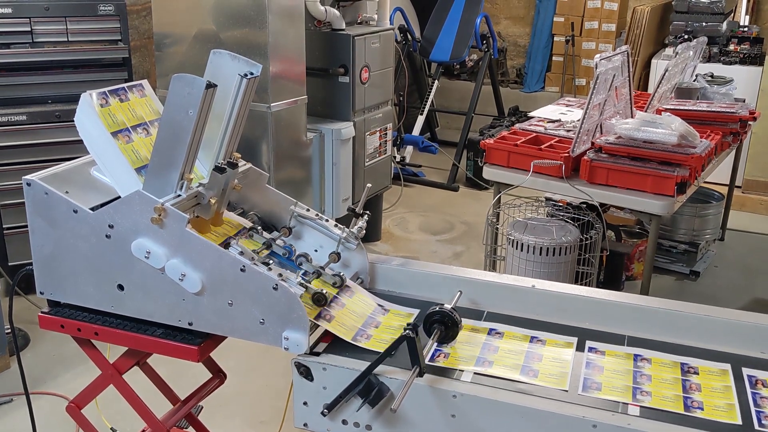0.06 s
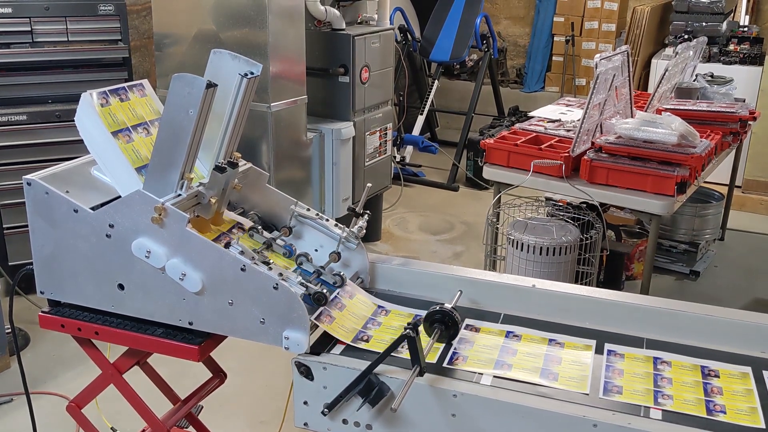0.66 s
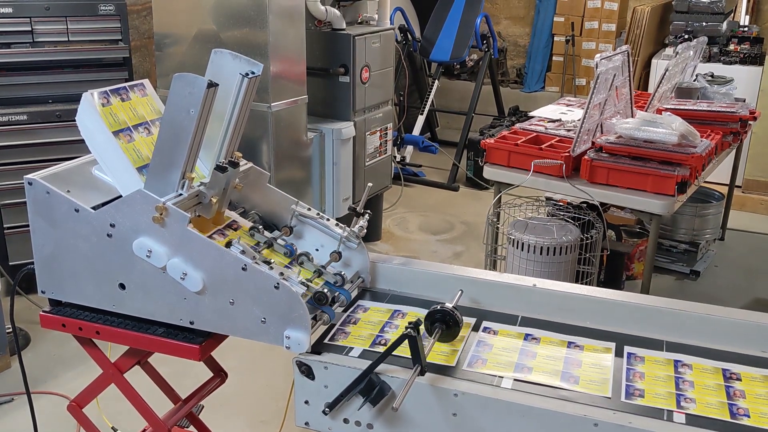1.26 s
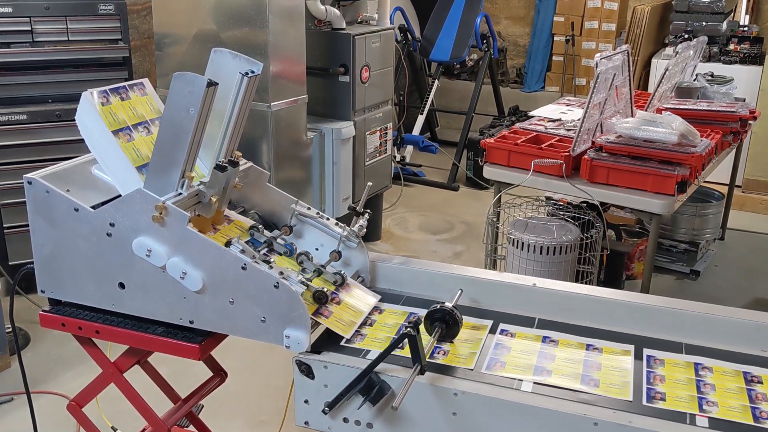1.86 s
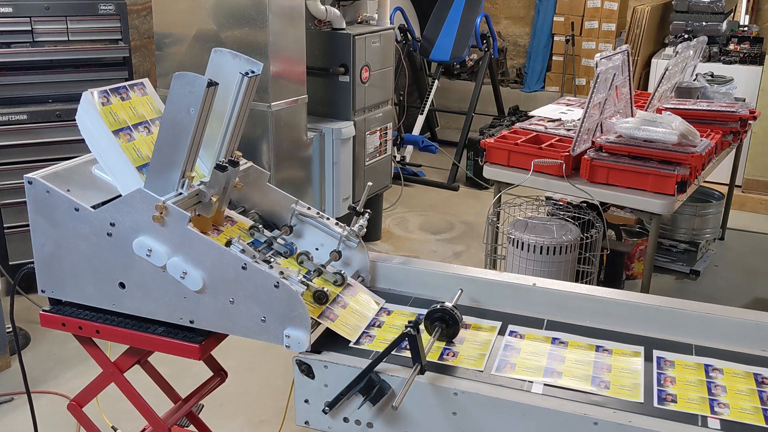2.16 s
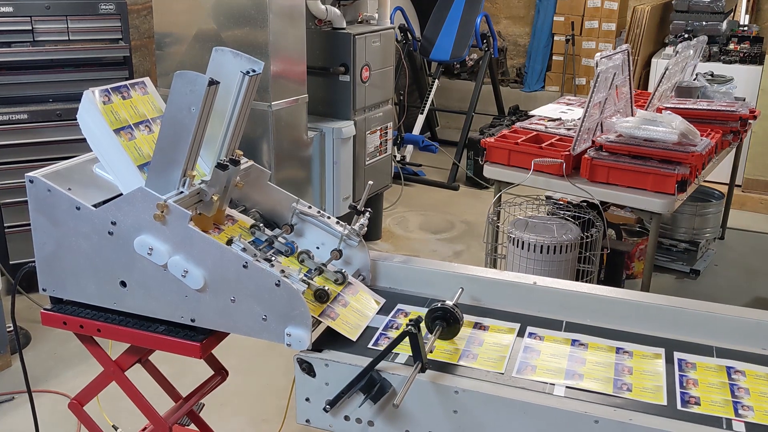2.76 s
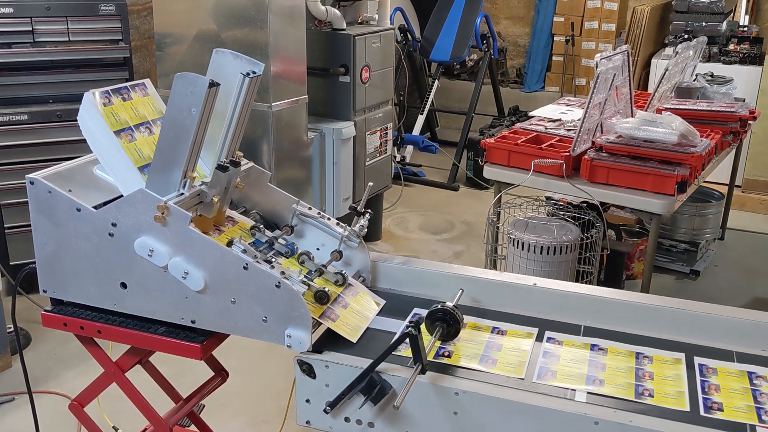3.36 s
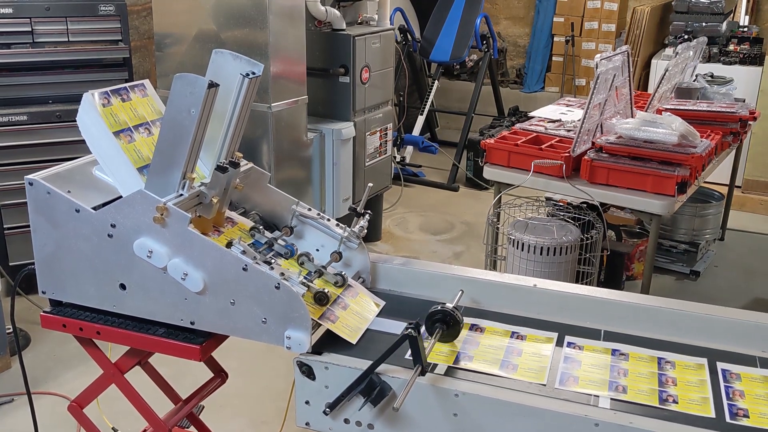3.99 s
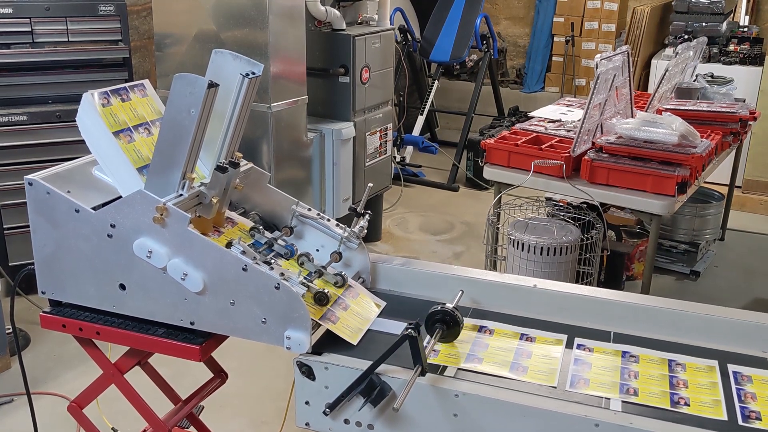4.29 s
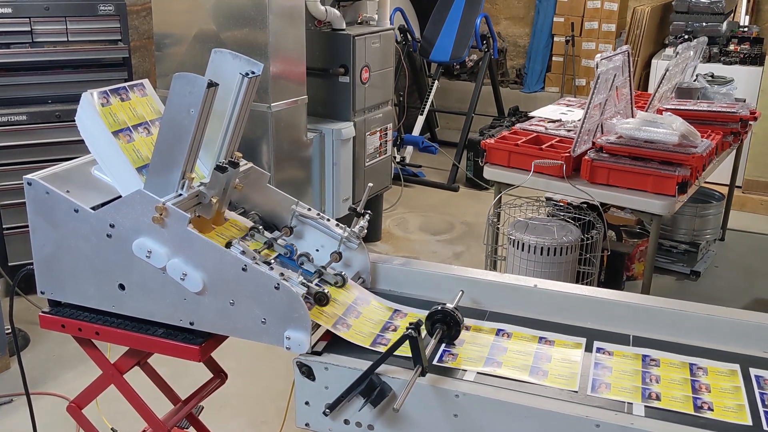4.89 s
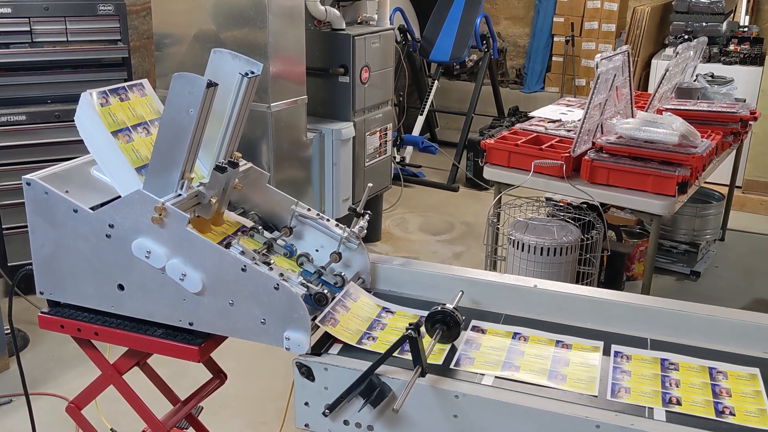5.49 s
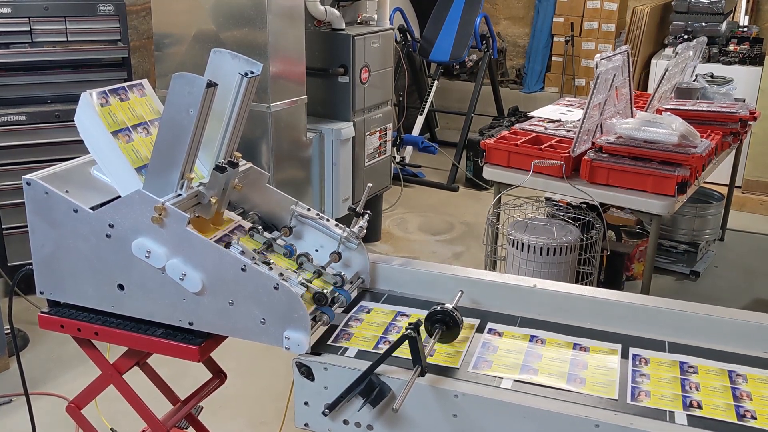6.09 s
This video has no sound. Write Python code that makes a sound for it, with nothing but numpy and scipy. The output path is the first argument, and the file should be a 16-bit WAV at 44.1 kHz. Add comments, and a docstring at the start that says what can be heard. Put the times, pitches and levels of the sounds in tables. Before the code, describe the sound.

From the start, a motorised feeder pushes out cards in a workshop with a short reverberation. Rubber rollers rasp and judder in runs of about nineteen beats a second, rattling the metal frame, ringing the roller shaft and snapping each card. Beneath them a motor hums, drive belts hiss and paper swishes, with an occasional flick of a card edge. The rasp breaks briefly between cards near 0.8 and 1.7 seconds, and a roller gives a short hoot at the second break. At about 2 seconds the feeder stops. Only the much quieter conveyor remains, its belt rubbing and its drum knocking softly and evenly, with a few faint card scuffs. At about 4.4 seconds the feeder restarts with a small bump. The hum, hiss and juddering rasp return, with short gaps near 4.9 and 5.8 seconds, and continue until the end, just past 6 seconds.

```python
"""Rubber rollers rasp and judder, about 19 times a second, as a friction feeder pushes out card after card.
Each judder rattles the metal frame, rings the roller shaft and snaps the card. Underneath, a mains motor
hums, drive belts hiss and paper swishes along the guides. The feeder rests for about two seconds and
starts again; the conveyor that takes the cards rubs and knocks softly in the workshop throughout."""
import sys
import numpy as np
from scipy import signal
from scipy.fft import rfft, irfft, next_fast_len
from scipy.io import wavfile
from scipy.ndimage import uniform_filter1d

SR = 44100
rng = np.random.default_rng(int(sys.argv[2]) if len(sys.argv) > 2 else 0)


def generate_wav(signal):
    """Clip the signal to [-1, 1] and save it as 16-bit WAV at the path in sys.argv[1]."""
    frames = np.transpose(np.atleast_2d(signal))
    scaled = np.clip(frames, -1, 1) * 32767
    pcm = np.round(scaled).astype(np.int16)
    wavfile.write(sys.argv[1], SR, pcm)


N = 275184
TIME = np.arange(N) / SR
SIZE = next_fast_len(N + SR)
HZ = np.maximum(np.arange(SIZE // 2 + 1) * SR / SIZE, 1)
MAINS_HZ, WORKSHOP_T60_S = 60, 0.34

# tone colour of rubber rasping on card: freq_hz, gain_db
RASP_COLOUR = [(290, -56), (500, -7), (612, -24.5), (986, -7), (1080, -6), (1590, -4), (2280, 0.5),
               (2600, -7), (3370, -1.5), (4430, -13), (6640, -27), (15800, -49)]
# tone colour of the frame's rumble: freq_hz, gain_db
RUMBLE_COLOUR = [(30, -15), (45, -58), (90, -28), (130, -16.5), (190, -5), (270, 8.5), (335, -4.5),
                 (420, -13.5), (600, -3.5), (1000, -37.5)]
# resonances of the feeder's metal frame: freq_hz, width_hz, lift_db
FRAME_MODES = [(317, 7.9, 15.5), (730, 93, 8.5), (860, 42, 10.5), (982, 59, 11.5), (1174, 86, 2.5),
               (1356, 45, 7), (1477, 44, 10.5), (1748, 32, 7.5), (1932, 96, 6.5), (2320, 50, -4.5),
               (2347, 71, 8), (2444, 33, 7), (2745, 170, 7), (3430, 82, 7.5), (3787, 90, 8),
               (6450, 140, -2)]


def from_db(db):
    """Decibels to amplitude."""
    return 10 ** (np.asarray(db) / 20)


def rms_one(x):
    """Scale to an rms of 1."""
    return x / np.sqrt(np.mean(x ** 2) + 1e-20)


def noise():
    """Two unrelated channels of white noise."""
    return rng.standard_normal((2, N))


def over_time(rows):
    """Each value column of a curve at every sample."""
    s, *columns = np.transpose(rows)
    return [np.interp(TIME, s, column) for column in columns]


def over_hz(points):
    """Points joined by straight lines on a log-frequency axis."""
    hz, value = np.transpose(points)
    return np.interp(np.log(HZ), np.log(hz), value)


def bell(peak_s, spread_s, at=TIME):
    """A smooth rise and fall that peaks at 1."""
    return np.exp(-((at - peak_s) / spread_s) ** 2 / 2)


def drift(rate_hz):
    """A slow random wander of rms 1."""
    return rms_one(irfft(rfft(rng.standard_normal(SIZE)) / (1 + (HZ / rate_hz) ** 4))[:N])


def taps(rows):
    """One click for each row of time_s, level_db."""
    s, db = np.transpose(rows)
    return np.bincount((s * SR).astype(int), from_db(db), N)


def causal(db):
    """The minimum-phase response with these gains."""
    cepstrum = irfft(np.log(from_db(db)), SIZE)
    fold = np.r_[1, np.full(SIZE // 2 - 1, 2), np.zeros(SIZE - SIZE // 2)]
    return np.exp(rfft(cepstrum * fold))


def mode(x, hz, t60_s):
    """A band-pass resonance of unit noise power."""
    r, w = from_db(-60 / (t60_s * SR)), 2 * np.pi * hz / SR
    return np.sqrt((1 - r * r) / 2) * signal.lfilter([1, 0, -1], [1, -2 * r * np.cos(w), r * r], x + 1e-18)


def radiate(pair, colour, resonances=()):
    """Two unrelated signals become left and right through a body filter of unit power."""
    # how alike the two microphones sound: freq_hz, likeness (capped at 1)
    likeness = [(50, 0.53), (130, 0.87), (240, 0.91), (450, 0.33), (800, 1.37), (1150, 0.2), (2300, 0.4),
                (4300, 0.14), (6500, 0.18), (10000, 0.051), (15000, 0.3)]
    peaks_db = sum(lift / (1 + (2 * (HZ - hz) / width) ** 2) for hz, width, lift in resonances)
    db = over_hz(colour) + peaks_db
    body = causal(db) / np.sqrt(np.mean(from_db(db) ** 2))
    alike = np.clip(over_hz(likeness), -1, 1)
    mid, side = rfft(pair, SIZE) * body * np.sqrt([(1 + alike) / 2, (1 - alike) / 2])
    return irfft([mid + side, mid - side], SIZE)[:, :N]


def ring_out(clicks, t60_s, crack_db, room_db):
    """Each contact gives a crack, a fresh mix of dense plate modes dying fast, and the room's tail."""
    t = TIME[:SR // 2]
    ring = rms_one(from_db(-60 * t / t60_s))
    room = from_db(room_db) * rms_one(from_db(-60 * t / WORKSHOP_T60_S) * (t > .005))
    crack = from_db(crack_db) * rms_one(np.exp(-t / 0.00046))
    decay = ring ** 2 + room ** 2 + crack ** 2
    power = signal.fftconvolve(clicks ** 2, decay / decay.sum())[:N]
    return np.sqrt(np.abs(power)) * noise()


def swells(rows):
    """For each row, noise in one resonance comes and goes."""
    rub = radiate(noise(), [(100, 0), (10000, 0)])
    return sum(from_db(db) * bell(s, spread_s) * mode(rub, hz, np.log(1000) / np.pi / width_hz)
               for s, spread_s, hz, width_hz, db in rows)


def standing_waves(x, ripple_db):
    """Reflections off the bench and walls comb the treble, differently at each microphone."""
    comb = rms_one(uniform_filter1d(rng.standard_normal((2, len(HZ))), size=200, axis=1))
    depth_db = ripple_db * np.clip((HZ - 1500) / 2500, 0, 1)
    return irfft(rfft(x, SIZE) * causal(depth_db * comb), SIZE)[:, :N]


def drum_knocks():
    """The conveyor's drum knocks twice a turn, strong then weak."""
    turn_s, on_beat_s = .2594, 2.247
    strong_db, weak_db, scatter_db = -46.5, -52.5, 1.5  # relative levels
    turns = np.arange(on_beat_s % turn_s, TIME[-1] - turn_s / 2, turn_s)
    hits = [(s + delay_s, db + scatter_db * rng.standard_normal())
            for s in turns for delay_s, db in [(0, strong_db), (turn_s / 2, weak_db)]]
    knocks = from_db(19.5) * ring_out(taps(hits), t60_s=0.26, crack_db=-16, room_db=1)
    return radiate(knocks, [(300, -43), (2400, -10), (3400, 7), (4800, -10), (15000, -22)])


def conveyor():
    """The belt rubs on its resonant bed and the drum knocks lightly, over a faint motor hum."""
    # rise and fall of the conveyor's rumble: time_s, relative_db
    rumble_curve = [(2.25, -67.5), (2.98, -73), (3.84, -63.5), (4.09, -74), (4.3, -69)]
    # tone colour of the rubbing belt: freq_hz, gain_db
    belt_colour = [(25, -14), (45, -6.5), (130, -4), (240, -7), (330, -9.5), (430, -12.5), (520, -13),
                   (620, -4.5), (850, -4.5), (1130, -10.5), (2200, -2), (3300, -3.5), (4500, -11.5),
                   (8500, -14.5), (11000, -21.5), (15800, -18.5)]
    # resonances of the conveyor bed: freq_hz, width_hz, lift_db
    bed_modes = [(583, 21, 11.5), (646, 36, 7.6), (754, 12, 8.2), (1033, 50, 6), (1310, 36, 10.6),
                 (1490, 62, 11.3), (1932, 22, 13.2), (2194, 130, 7.3), (2320, 59, 9), (2470, 12, 7.8),
                 (2930, 70, 10.6), (3260, 35, 5), (7070, 100, 1.3)]
    rumble_db, = over_time(rumble_curve)
    rub_db = -56.5 + 0.16 * (rumble_db - np.mean(rumble_db))
    rub = from_db(rub_db) * radiate(noise(), belt_colour, bed_modes)
    bed_colour = [(400, -33), (600, -8.5), (800, -0.5), (1100, -27), (3000, -66)]
    rumble = from_db(rumble_db + 1.5) * radiate(noise(), bed_colour, bed_modes)
    knocks = drum_knocks()
    hum = sum(from_db(db + 2.1 * drift(6.2)) * np.sin(2 * np.pi * harmonic * MAINS_HZ * TIME)
              for harmonic, db in [(4, -70.5), (6, -77)])
    return rub + rumble + hum + knocks


def scuffs():
    """Now and then a card scuffs along the belt."""
    # brief bright rubs: peak_s, spread_s, pitch_hz, width_hz, level_db
    rubs = [(2.14, .03, 5270, 900, -60), (2.41, 0.022, 6640, 600, -67), (3.56, .03, 3430, 400, -65),
            (4.93, 0.084, 6400, 600, -53)]
    return swells(rubs)


def lift_table():
    """The lift table under the feeder drones at twice the mains and rumbles."""
    # swells of the drone: peak_s, spread_s, relative_db
    surges = [(0.334, 0.085, -69), (1.286, .04, -70), (2.0, .07, -75), (4.903, 0.24, -68)]
    level = from_db(-77) + sum(from_db(db) * bell(s, spread_s) for s, spread_s, db in surges)
    drone = level * from_db(4 + 1.7 * drift(2.3)) * np.sin(4 * np.pi * MAINS_HZ * TIME)
    rumble = from_db(-85) * radiate(noise(), [(30, -44), (60, -29), (115, -16), (170, 20), (300, -15)])
    return drone + rumble


def jolts():
    """The drive jolts the stand."""
    # low bumps: peak_s, spread_s, pitch_hz, width_hz, level_db
    bumps = [(.56, 0.019, 150, 45, -61), (2.11, 0.033, 247, 40, -58.5), (4.378, 0.016, 335, 80, -49),
             (5.22, 0.02, 143, 60, -53)]
    return swells(bumps)


def motor():
    """Magnetic pull shakes the frame at even multiples of the mains; the load makes each line waver."""
    # lines of the hum: mains_multiple, relative_db, waver_db
    partials = [(4, 1, 1), (6, -11, 2.1), (8, -12.5, 1), (12, -24.5, 3.5), (14, -17.5, 3), (16, -29, 6.5)]
    phase = 2 * np.pi * MAINS_HZ * TIME + 0.0068 * drift(22)
    hum = sum(from_db(db + waver_db * drift(14.3)) * np.sin(multiple * phase + rng.uniform(0, 2 * np.pi))
              for multiple, db, waver_db in partials)
    return rms_one(hum)


def drive():
    """Belts and gears hiss, throbbing with the motor's torque, over a low rumble."""
    # tone colour of the hiss: freq_hz, gain_db
    hiss_colour = [(300, -15.5), (560, -6.5), (760, 0), (900, -4), (1150, -6), (1600, -1.5), (2400, -1.5),
                   (4000, 2.5), (5500, 1), (6700, -1), (7800, -20), (10000, -14), (15800, -21)]
    throb = 1 + 0.15 * np.sin(4 * np.pi * MAINS_HZ * TIME)
    hiss = from_db(-44) * radiate(throb * noise(), hiss_colour, FRAME_MODES)
    return hiss + from_db(-52.5) * radiate(noise(), RUMBLE_COLOUR)


def paper(slide_level):
    """Cards swish along the guides and their edges flick past."""
    # card edges catching the guides: time_s, relative_db
    edges = [(0.2982, -51), (1.4631, -44.5), (4.368, -55), (4.6633, -46), (6.1324, -43)]
    # tone colour of sliding paper: freq_hz, gain_db
    swish_colour = [(3000, -20), (6500, 7.5), (8800, 1), (10200, -6.5), (12000, -3), (15800, -7)]
    # resonances of the sheet-metal guides: freq_hz, width_hz, lift_db
    guide_modes = [(6400, 250, 6), (8250, 300, 3.5), (9100, 120, 10.5), (9500, 120, 4), (12100, 400, 0)]
    swish = from_db(-0.5) * radiate(slide_level * noise(), swish_colour, guide_modes)
    flicks = from_db(27.5) * ring_out(taps(edges), t60_s=0.062, crack_db=-11, room_db=-11)
    return swish + radiate(flicks, [(2000, -21), (7000, 2), (12000, -7), (15800, -5)])


def hoots():
    """Between two cards a brief squeak sings out, a little unsteady in pitch."""
    # the squeak's notes: peak_s, spread_s, pitch_hz, level_db
    notes = [(1.69, 0.057, 722, -47.5), (1.62, 0.042, 700, -49)]
    waver = .3 * drift(22)
    return sum(from_db(db) * bell(s, spread_s) * np.sin(2 * np.pi * hz * TIME + waver)
               for s, spread_s, hz, db in notes)


def slips(per_s, spread_db):
    """Tiny random slips of uneven size, as clicks of rms 1."""
    sizes = from_db(spread_db * np.minimum(rng.exponential(1, N), 4)) * rng.choice([-1, 1], N)
    return rms_one(sizes * (rng.random(N) < per_s / SR))


def roller_rasp(grip_s, release_s):
    """Rubber drags over each card in fine slips that ring the frame, dying as the card's tail leaves."""
    # cards passing under the separator roller: start_s, end_s, relative_db
    cards = [(-.05, .72, -43.5), (0.845, 1.618, -44), (1.747, 2.044, -43.5), (4.382, 4.834, -43.5),
             (5.046, 5.706, -43.5), (5.86, 6.3, -43)]
    drag = np.zeros(N)
    for start_s, end_s, db in cards:
        grip = np.clip((TIME - start_s) / grip_s, 0, 1)
        release = np.exp(-np.maximum(TIME - end_s, 0) / release_s)
        drag += from_db(db) * grip * release
    grit = ring_out(slips(per_s=1100, spread_db=3.5), t60_s=0.042, crack_db=1, room_db=5)
    rasp = from_db(-1.5) * radiate(drag * grit, RASP_COLOUR, FRAME_MODES)
    thrum = from_db(-10.5) * drag * radiate(noise(), RUMBLE_COLOUR, FRAME_MODES)
    return rasp + thrum


def judder_hits():
    """A run is a light touch, the grab, then judders that mostly fade; rows are laid out as in catches."""
    # the roller catching again straight after a judder: time_s, rattle_db, shaft_db, snap_db (relative)
    catches = [(1.359, -39, -40, -38.5), (1.897, -24, -36, -40.5), (6.04, -28, -37, -42)]
    # runs of judders, about two to a card: start_s, count, first_gap_s, last_gap_s, grab_db,
    # touch_db (against the grab), step_db (per judder), ring_peak_s, ring_db (of the shaft)
    runs = [(.008, 6, 0.056, 0.042, -24.5, -4, -1, .07, -46),
            (.369, 7, 0.063, 0.043, -24.5, -5, -1.6, .54, -33.5),
            (.849, 7, 0.061, 0.046, -24.5, -6, -.3, 1.0, -31.5),
            (1.234, 7, 0.056, 0.054, -20, -7.5, -1.8, 1.41, -41),
            (1.722, 6, .0555, .0555, -24.5, -3.5, -.7, 1.87, -34),
            (4.407, 8, .0686, .047, -25, -0.5, 0.4, 4.68, -28),
            (5.014, 5, .047, .056, -23, -7.5, -0.04, 5.11, -36.5),
            (5.321, 2, 0.052, .054, -25.5, -11, -1, 5.37, -42),
            (5.423, 6, .057, .051, -23, -26, -2, 5.54, -30.5),
            (5.814, 8, .052, .053, -23.5, -18.5, -0.36, 6.0, -33)]
    scatter_db = 1.67
    hits = list(catches)
    for start_s, count, first_gap_s, last_gap_s, grab_db, touch_db, step_db, ring_peak_s, ring_db in runs:
        turn = np.arange(count)
        times = start_s + np.r_[0, np.cumsum(np.linspace(first_gap_s, last_gap_s, count - 1))]
        rattle_db = grab_db + np.where(turn == 0, touch_db, step_db * (turn - 1))
        rattle_db = rattle_db + scatter_db * rng.standard_normal(count)
        ring = from_db(ring_db) * bell(ring_peak_s, spread_s=0.05, at=times)
        shaft = np.hypot(ring, from_db(rattle_db - 22.5))
        # the snap takes part of the rattle's swing and is harder while the shaft rings
        snap = np.hypot(ring * from_db(-9), from_db(-25 + 0.69 * rattle_db))
        hits += zip(times, rattle_db, 20 * np.log10(shaft), 20 * np.log10(snap))
    return hits


def bounces(hits, length_s, fade_db, count):
    """A roller grabs and lets go: a knock, then smaller bounces. One click train for each level column."""
    clicks = np.zeros((len(hits[0]) - 1, N + SR))
    turn = np.arange(count)
    for s, *levels_db in hits:
        progress = (turn + rng.uniform(-.45, .45, count) * (turn > 0)) / count
        sizes = from_db(fade_db * progress + 1.1 * rng.standard_normal(count))
        samples = ((s + progress * length_s) * SR).astype(int)
        clicks[:, samples] += np.outer(from_db(levels_db), rms_one(sizes))
    return clicks[:, :N]


def roller_judder():
    """The roller's bounces rattle the frame, ring the shaft and snap the card."""
    # ringing of the roller shaft: pitch_hz, relative_db, t60_s
    shaft_modes = [(2225, 0.5, 0.065), (2280, -7.5, 0.1), (2387, -5, 0.14)]
    # tone colour of a card snapping free of the roller: freq_hz, gain_db
    snap_colour = [(1500, -22), (2200, -5.5), (2800, -2.5), (3400, -4), (3800, 4), (4300, -5), (4750, -4),
                   (5200, 0), (5600, 0.5), (6100, -10.5), (7000, -8.5), (8000, -14.5), (10500, -28),
                   (15000, -28)]
    frame_clicks, shaft_clicks, card_clicks = bounces(judder_hits(), length_s=.016, fade_db=-4, count=7)
    rattle = ring_out(frame_clicks, t60_s=.06, crack_db=-4.5, room_db=3)
    push = ring_out(shaft_clicks, t60_s=0.016, crack_db=-1, room_db=1)
    snap = ring_out(card_clicks, t60_s=0.012, crack_db=-2, room_db=1)
    frame = from_db(9.5) * radiate(rattle, RASP_COLOUR, FRAME_MODES)
    shaft = from_db(15) * sum(from_db(db) * mode(push, hz, t60_s) for hz, db, t60_s in shaft_modes)
    card = from_db(22.5) * radiate(snap, snap_colour)
    return frame + shaft + card


def feeder_speed(stop_s, coast_s, restart_s, spin_up_s):
    """From 1 the feeder coasts down to rest at 0, then spins up again."""
    coast = np.exp(-np.maximum(TIME - stop_s, 0) / coast_s)
    return np.maximum(coast, np.clip((TIME - restart_s) / spin_up_s, 0, 1))


def scene():
    """Hum, drone and swish fade with the feeder's speed, the drive more steeply; the conveyor runs on."""
    # the feed before and after the pause: time_s, hum_db, slide_db (relative)
    feed = [(0, -39.5, -50.5), (0.07, -43.5, -47.5), (0.18, -41, -49), (0.45, -42, -51.5),
            (0.73, -39.5, -52), (1.44, -42, -48.5), (1.65, -42.5, -49), (1.89, -43, -46.5),
            (2.04, -42.5, -55), (4.41, -44, -62), (4.526, -42, -52.5), (4.736, -42.5, -48.5),
            (4.862, -40.5, -50), (5.602, -43, -52), (5.694, -41, -54), (6.092, -42, -50),
            (6.178, -46, -49), (6.24, -43.5, -52)]
    speed = feeder_speed(stop_s=2.048, coast_s=.038, restart_s=4.354, spin_up_s=.05)
    hum_level, slide_level = speed * from_db(over_time(feed))
    hum = from_db(-0.5) * hum_level * motor() + speed * lift_table()
    rollers = roller_rasp(grip_s=0.018, release_s=0.026) + roller_judder()
    feeder = hum + rollers + speed ** 2 * drive() + jolts()
    workshop = feeder + paper(slide_level) + scuffs() + conveyor()
    return standing_waves(workshop, ripple_db=1.2) + hoots()


def record(dry):
    """Each microphone port has its own colour and delay; the deep bass and the top are cut."""
    # balance between the microphones: freq_hz, left_minus_right_db
    balance = [(200, 0.9), (700, -1.5), (1100, 0), (2200, 0.5), (3200, 0.5), (3800, -3.5), (5500, -5.5),
               (6100, -1), (6600, -10.5), (7300, 2.5), (8900, 6.5), (11500, 7.5), (14000, 0.5)]
    # delay between the microphones: freq_hz, left_lead_rad
    lead = [(100, -0.2), (240, 0.16), (480, 0.5), (620, .5), (950, 0.9), (1100, 1.34), (1500, 1.62),
            (1900, 2.5), (2400, .5), (2900, 2.5), (3400, 1), (4300, 4.5), (5500, 3.5), (6200, -0.5),
            (7500, 1.5)]
    low_cut_hz, high_cut_hz = 32, 15800
    tilt_db = over_hz(balance) / 2
    lag = np.exp(-1j * over_hz(lead))
    band = 1 / (1 + (HZ / high_cut_hz) ** 200) / (1 + (low_cut_hz / HZ) ** 6)
    return irfft(rfft(dry, SIZE) * band * [from_db(tilt_db), from_db(-tilt_db) * lag], SIZE)[:, :N]


dry = scene()
out = record(dry)
generate_wav(out)
```